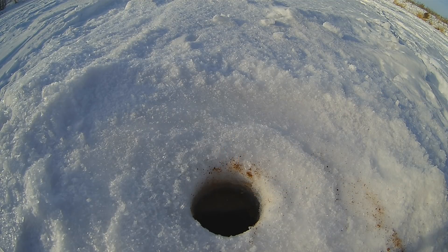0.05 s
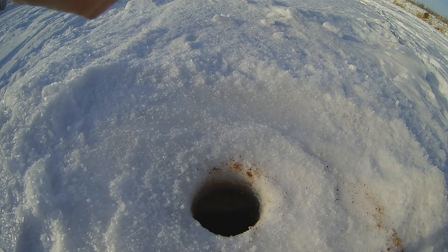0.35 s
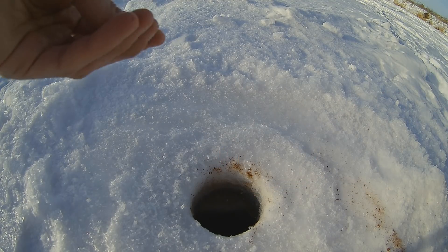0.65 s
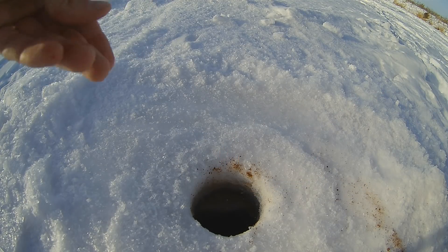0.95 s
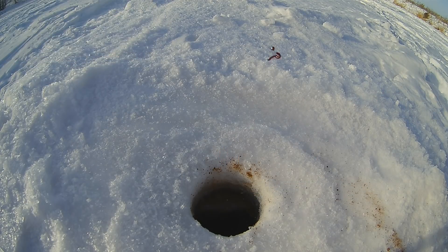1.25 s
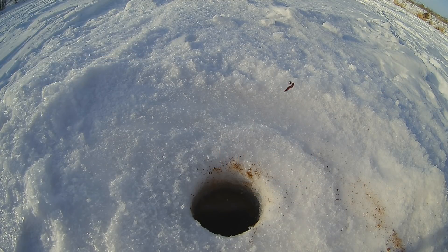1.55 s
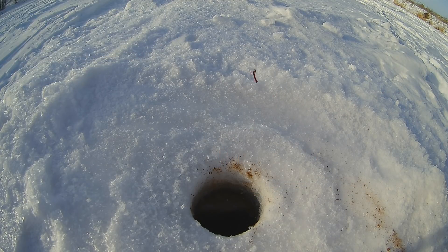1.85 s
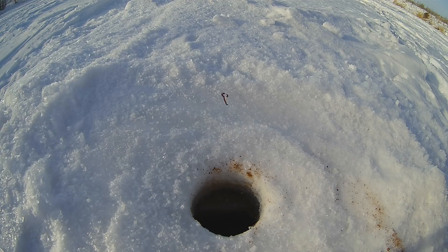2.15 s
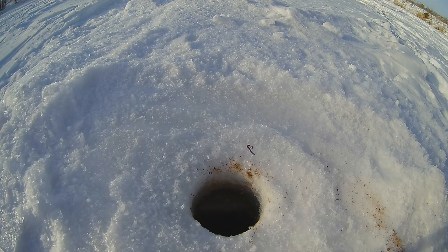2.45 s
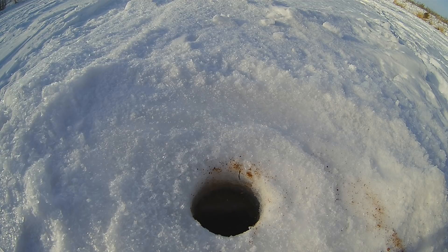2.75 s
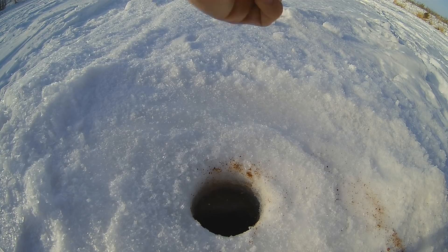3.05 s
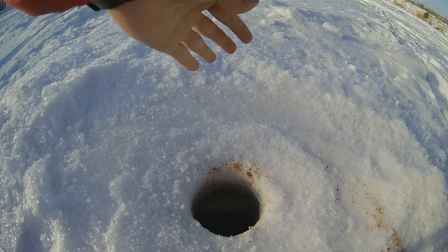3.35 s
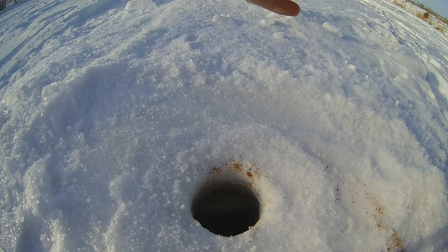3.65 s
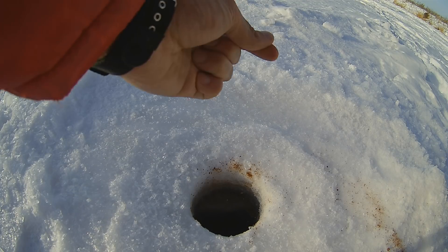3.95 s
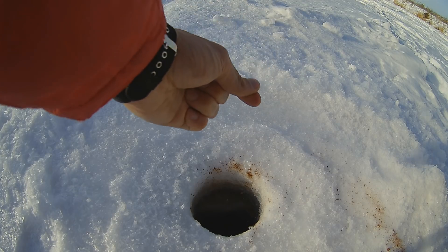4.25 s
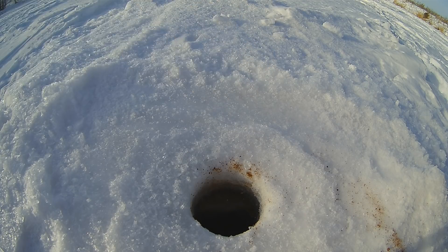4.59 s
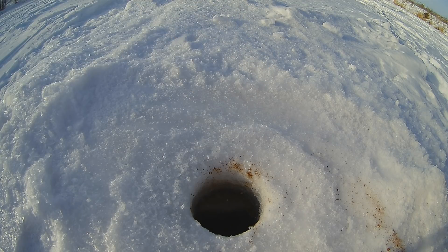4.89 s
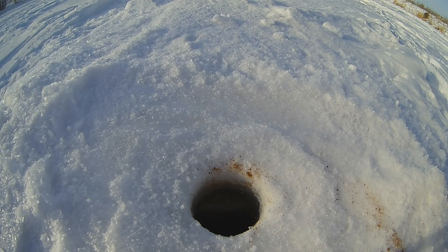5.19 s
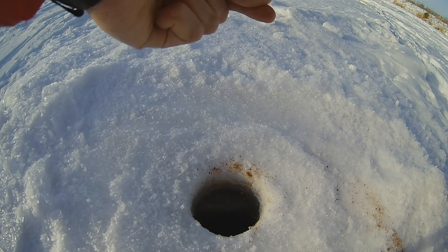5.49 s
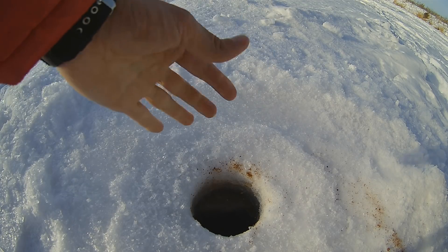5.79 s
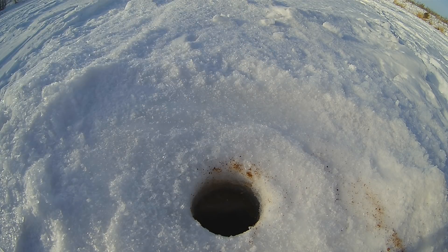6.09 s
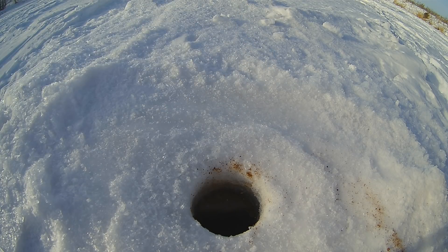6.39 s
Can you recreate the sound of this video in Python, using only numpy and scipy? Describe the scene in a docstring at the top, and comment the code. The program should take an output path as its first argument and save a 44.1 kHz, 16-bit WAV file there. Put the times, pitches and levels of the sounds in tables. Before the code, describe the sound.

Two drawn-out, slightly hoarse whines from an animal follow soft sleeve ticks and high squeaks on a quiet frozen lake.

```python
"""On a still, frozen lake an animal gives short notes, then two long, whining calls.
Faint chirps and thin, high squeaks come in between. The calls are nasal: a tone near 1.3 kHz plus
overtones (multiples of its pitch) shaped by the throat. Each swells, catches and turns hoarse for
moments; the snow gives back almost no echo. A sleeve ticks softly as a hand drops bait by an ice hole,
over low rumble, hiss and a faint electrical hum."""
import sys
import numpy as np
from scipy import signal
from scipy.fft import rfft, irfft
from scipy.io import wavfile

SR = 44100
rng = np.random.default_rng(int(sys.argv[2]) if len(sys.argv) > 2 else 0)


def wav_out(sig):
    """Save sig, one row per channel (or a flat mono array), as 16-bit PCM at SR to the path in sys.argv[1]."""
    wavfile.write(sys.argv[1], SR, np.round(np.clip(np.atleast_2d(sig).T, -1, 1) * 32767).astype(np.int16))


N = 292383

# spectrum of the rumble and hiss: f/Hz, relative level/dB
AIR_SPECTRUM = [(12, -25), (20, 3.5), (48, -9.5), (76, 1), (187, -8.5), (209, -10.5), (233, -9),
                (268, -11.5), (300, -11), (408, -13.5), (586, -13), (1350, -20), (1890, -26), (8090, -37.5),
                (15800, -35.5)]
# tones of the hum: multiple of its base pitch, relative level/dB
HUM_TONES = [(1, -89), (2, -64.5), (3, -69.5), (4, -74.5), (5, -74), (6, -71), (8, -74.5), (10, -75),
             (13, -78.5)]
# resonances, the bands that the throat makes louder: f/Hz, width/Hz
THROAT_BANDS = [(3850, 2100), (5200, 590), (6800, 480), (10600, 6100)]
# extra boost or cut of the overtones: f/Hz, gain/dB
OVERTONE_COLOUR = [(3000, 0.5), (4000, 1.5), (6800, -0.5), (7400, 5.5), (8100, -19.5), (9300, 2.5),
                   (12200, -2.5), (13200, -26), (15000, -11)]
# the voice catches: t/s, half length/s, share lost by the base tone, share lost by the overtones
VOICE_DIPS = [(3.969, 0.012, 0.58, 0.26), (4.034, 0.066, 0.52, 0.21), (4.114, 0.01, 0.43, 0.19),
              (4.142, 0.033, 0.87, 0.4), (4.217, 0.026, 0.46, 0.32), (4.333, 0.0056, 0.36, .1),
              (4.269, 0.015, 0.87, 0.69), (4.382, 0.017, 0.84, .6), (5.34, 0.041, 0.9, 0.081),
              (5.389, 0.012, .1, 0.48), (5.489, 0.034, .78, 0.042), (5.534, 0.02, .05, 0.58),
              (5.563, 0.011, 0.41, 0.51), (5.625, 0.023, 0.78, 0.018), (5.691, 0.0098, 0.54, 0.31),
              (5.757, 0.037, 0.96, .05)]
# hoarse moments: t/s, half length/s, depths of two-cycle wobble, four-cycle wobble and random flutter
HOARSE_MOMENTS = [(3.91, 0.0082, 0.017, 0.17, 0.094), (4.039, 0.009, .02, .17, 0.083),
                  (4.124, 0.015, .02, 0.19, 0.12), (4.312, 0.0072, 0.29, 0.0089, 0.025),
                  (4.427, .02, 0.054, 0.016, 0.042), (4.486, 0.025, .05, .05, 0.16),
                  (5.555, 0.0093, 0.42, .01, 0.013), (5.679, 0.0069, .25, 0.017, 0.058),
                  (5.817, 0.0069, 0.048, .05, .1)]
# short notes: start t/s, rise/s, fall/s, start f/Hz, end f/Hz, base level/dB, relative overtone level/dB
NOTES = [(.007, 0.0032, 0.11, 1348, 1284, -40.5, -66), (2.339, 0.01, 0.01, 1172, 1220, -36.5, -59),
         (2.355, .007, 0.018, 1215, 1250, -48.5, -64), (4.483, 0.0033, 0.015, 1123, 970, -47, -58),
         (5.245, 0.044, 0.0055, 1287, 1286, -41.5, -71), (6.602, 0.0076, 0.074, 1198, 1373, -44.5, -43)]
# the sleeve rustles as the arm moves: t/s, half length/s, relative level/dB
RUSTLES = [(.3, 0.73, -73.5), (1.2, .3, -78), (4.15, 0.46, -66.5), (5.4, 0.55, -73)]
# ticks of sleeve and bait: t/s, relative knock level/dB, relative snap level/dB
SOFT_TICKS = [(.459, -52, -58), (.501, -46, -52), (.557, -52, -56), (.582, -50, -53), (.596, -53, -55),
              (.608, -41, -52), (1.046, -51, -58), (1.089, -51, -58), (1.162, -50, -55), (2.904, -48, -63),
              (3.344, -53, -63), (4.931, -46, -54)]
# a tick's low knock and bright snap: f/Hz, width/Hz
TICK_BANDS = [(1300, 900), (3400, 1200)]
# far-off chirps: start t/s, rise/s, fall/s, start f/Hz, loudest f/Hz, end f/Hz, level/dB
CHIRPS = [(1.95, 0.026, 0.07, 1320, 1345, 1320, -61.5), (2.059, 0.061, 0.056, 1320, 1350, 1310, -64),
          (3.736, 0.0083, .016, 1540, 1690, 2190, -55.5), (3.761, .018, .03, 2045, 1625, 910, -57)]
# thin, high squeaks: start t/s, rise/s, fall/s, start f/Hz, loudest f/Hz, end f/Hz, level/dB
SQUEAKS = [(2.28, .008, 0.03, 8650, 8800, 8950, -60), (2.306, .008, .008, 8850, 8450, 7900, -52),
           (2.325, 0.012, 0.0055, 7520, 7250, 7130, -33), (2.342, 0.0055, .009, 7100, 7150, 7250, -53),
           (2.624, .006, .014, 8800, 8550, 8300, -60), (2.671, 0.011, 0.013, 8500, 8170, 8100, -52),
           (2.697, 0.0078, .018, 7950, 8320, 8540, -44.5), (2.707, 0.057, 0.014, 8350, 8620, 8130, -36),
           (2.776, 0.023, .018, 8100, 8300, 8650, -53), (2.765, .02, .022, 7050, 6750, 6850, -64),
           (4.461, 0.0098, 0.0097, 7500, 7060, 6900, -53), (5.237, .007, .008, 7400, 7450, 7600, -64),
           (5.839, 0.0066, .006, 7300, 6960, 7250, -45), (5.852, 0.0073, 0.013, 7300, 7280, 7200, -54),
           (6.596, 0.0067, 0.017, 7350, 7210, 7260, -54)]
# a brief buzz in the squeaking: t/s, half length/s, beat f/Hz
SQUEAK_BUZZ = (2.798, 0.012, 310)
# long calls: start t/s, length/s, release/s, loudest after/s, base level/dB, sag towards the ends/dB,
# gain of the overtone at twice the pitch/dB, gain of the top throat band/dB
CALLS = [(3.9, 0.579, .045, 0.29, -22, 8.5, -9.5, -13), (5.292, .552, 0.016, 0.21, -22.5, 6.5, -1, -6)]
# pitch curve of each call: t/s, f/Hz
PITCH_CURVES = [
    [(3.918, 1324), (3.96, 1340), (4.038, 1374), (4.092, 1319), (4.11, 1308), (4.15, 1359), (4.19, 1337),
     (4.382, 1350), (4.448, 1323)],
    [(5.306, 1278), (5.362, 1304), (5.5, 1340), (5.586, 1338), (5.742, 1311), (5.826, 1295)],
]
# overtone curves of each call: t/s, relative lower level/dB, relative upper level/dB
OVERTONE_CURVES = [
    [(3.912, -48.5, -59), (3.932, -41.5, -54.5), (4.006, -42.5, -64), (4.024, -53.5, -58.5),
     (4.174, -45.5, -47.5), (4.19, -50.5, -49), (4.276, -43, -46.5), (4.362, -45.5, -46),
     (4.465, -48, -55.5)],
    [(5.3, -39.5, -54), (5.448, -37, -59), (5.468, -43, -52), (5.51, -41.5, -54), (5.52, -43.5, -60),
     (5.708, -48, -54.5), (5.734, -52.5, -51), (5.822, -50.5, -60.5), (5.83, -42, -61.5)],
]


def from_db(db):
    return 10 ** (np.asarray(db) / 20)


def unit_level(x):
    return x / np.sqrt(np.mean(x ** 2) + 1e-20)


def gain_at(spectrum, hz):
    """Read a spectrum's gain on a log-frequency axis."""
    freq, db = np.transpose(spectrum)
    return from_db(np.interp(np.log(np.maximum(hz, 1)), np.log(freq), db))


def read_curves(rows, t):
    times, *columns = np.transpose(rows)
    return [np.interp(t, times, column) for column in columns]


def note_span(start, length):
    """Sample numbers and times of one note."""
    at = np.arange(max(int(start * SR), 0), min(int((start + length) * SR), N))
    return at, at / SR


def bump(t, centre, half_length):
    return np.exp(-((t - centre) / half_length) ** 2)


def swell(t, start, rise, fall, values=(0, 1, 0)):
    """Straight lines from a note's start to its loudest moment and on to its end."""
    return np.interp(t, [start, start + rise, start + rise + fall], values)


def drift(rate, size):
    """A smooth random wander of about 1 that changes about rate times a second."""
    hz = np.fft.rfftfreq(SR, 1 / SR)
    return unit_level(irfft(rfft(rng.standard_normal(SR)) / (1 + (hz / rate) ** 4), SR))[:size]


def band_noise(centre_hz, width_hz, size):
    """Noise through one resonance."""
    r = np.exp(-np.pi * width_hz / SR)
    poles = [1, -2 * r * np.cos(2 * np.pi * centre_hz / SR), r * r]
    return unit_level(signal.lfilter([1, 0, -1], poles, rng.standard_normal(size)))


def rumble_and_hiss(level_db=-54):
    """Steady noise, strongest in the deep bass."""
    hz = np.fft.rfftfreq(N, 1 / SR)
    noise = irfft(rfft(rng.standard_normal(N)) * gain_at(AIR_SPECTRUM, hz), N)
    return from_db(level_db) * unit_level(noise)


def hum(base_hz=29.8, gain_db=-0.5):
    """A weak electrical hum: steady tones at multiples of one low pitch."""
    t = np.arange(N) / SR
    tones = sum(from_db(db) * np.sin(2 * np.pi * (k * base_hz * t + rng.random())) for k, db in HUM_TONES)
    return from_db(gain_db) * np.sqrt(2) * tones


def throat(hz, drives_db):
    """Strength of an overtone after the throat's bands, each driven at its own level."""
    power = sum(from_db(db) ** 2 / (1 + (2 * (hz - centre) / width) ** 4)
                for (centre, width), db in zip(THROAT_BANDS, drives_db))
    return np.sqrt(power) * gain_at(OVERTONE_COLOUR, hz)


def voice(t, pitch, base, overtones, drives_db, second_db, shimmer_db=3.0, shimmer_hz=32):
    """A base tone with overtones; when hoarse, its cycles repeat in twos or fours, adding tones between."""
    size = len(t)
    twos, fours, flutter = sum(np.outer(depths, bump(t, s, w)) for s, w, *depths in HOARSE_MOMENTS)
    flutter += 0.012  # even the clear voice rasps a little
    # the overtones hold on longer into a dip than the base tone does
    for when, half_length, base_lost, overtones_lost in VOICE_DIPS:
        base = base * (1 - base_lost * bump(t, when, half_length))
        overtones = overtones * (1 - overtones_lost * bump(t, when, half_length / 2))
    tremble = 1 + 0.0042 * drift(55, size)
    phase = 2 * np.pi * np.cumsum(pitch * tremble) / SR
    phase += 0.41 * flutter * drift(1600, size)  # single cycles come early or late
    out = base * from_db(1.18 * drift(56, size)) * np.sin(phase)
    out += base * twos * (.1 * np.sin(phase / 2) + .22 * np.sin(1.5 * phase))
    out += base * fours * (.5 * np.sin(.75 * phase) + .2 * np.sin(1.25 * phase) + .2 * np.sin(1.5 * phase))
    # the tone at twice the pitch lies below the throat's bands and follows their average drive
    second = from_db(np.mean(drives_db, axis=0) + second_db + shimmer_db * drift(shimmer_hz, size))
    out += overtones * second * np.sin(2 * phase)
    for k in range(3, 12):
        # each overtone wavers on its own, the high ones most
        waver = from_db((shimmer_db + 0.7 * k) * np.tanh(drift(shimmer_hz, size)))
        strength = overtones * throat(k * pitch, drives_db) * waver
        out += strength * np.sin(k * phase + rng.uniform(0, 2 * np.pi))
        between = k - .5
        out += 1.16 * twos * overtones * throat(between * pitch, drives_db) * np.sin(between * phase)
    return out * (1 + flutter * drift(380, size))


def short_notes(drives_db=(-2, 6, -4, -25)):
    """The animal's voice in brief: one swell on one slide in pitch."""
    out = np.zeros(N)
    for start, rise, fall, start_hz, end_hz, base_db, overtone_db in NOTES:
        at, t = note_span(start, rise + fall)
        pitch = np.interp(t, [start, start + rise + fall], [start_hz, end_hz])
        gain = swell(t, start, rise, fall)
        out[at] += voice(t, pitch, from_db(base_db) * gain, from_db(overtone_db) * gain,
                         drives_db, second_db=2.5)
    return out


def sleeve_and_bait(decay_s=0.0037, tick_gain_db=-1, muffle_hz=4800):
    """Cloth rustles as the arm moves; each muffled tick is a tiny burst of noise in two bands."""
    t = np.arange(N) / SR
    movement = sum(from_db(db) * bump(t, s, w) for s, w, db in RUSTLES)
    out = movement * band_noise(2700, 3600, N)
    age = t[:SR // 20]
    for when, *levels in SOFT_TICKS:
        start = int(when * SR)
        for db, (hz, width) in zip(levels, TICK_BANDS):
            band = signal.butter(2, [hz - width / 2, hz + width / 2], "band", fs=SR, output="sos")
            burst = signal.sosfilt(band, np.exp(-age / decay_s) * rng.standard_normal(len(age)))
            out[start:start + len(age)] += from_db(db + tick_gain_db) * burst / np.abs(burst).max()
    return signal.sosfilt(signal.butter(2, muffle_hz, fs=SR, output="sos"), out)


def chirps_and_squeaks(shimmer_db=2.1):
    """Each is one unsteady, pure tone that swells and bends where it is loudest."""
    out = np.zeros(N)
    buzz_time, buzz_half_length, beat_hz = SQUEAK_BUZZ
    for start, rise, fall, *pitches, db in SQUEAKS + CHIRPS:
        at, t = note_span(start, rise + fall)
        pitch = swell(t, start, rise, fall, pitches) * (1 + 0.0025 * drift(250, len(t)))
        phase = 2 * np.pi * np.cumsum(pitch) / SR
        buzz = 1 + bump(t, buzz_time, buzz_half_length) * np.sin(2 * np.pi * beat_hz * t)
        gain = from_db(db + shimmer_db * drift(100, len(t))) * swell(t, start, rise, fall)
        out[at] += gain * buzz * np.sin(phase)
    return out


def whining_calls(scoop_hz=113, scoop_s=0.00696, drop_hz=173.4, attack_s=0.017, overtone_fade_s=0.0079):
    """Each call scoops up to its pitch, swells in an arch and drops in pitch as it dies."""
    out = np.zeros(N)
    for call, pitch_curve, overtone_curves in zip(CALLS, PITCH_CURVES, OVERTONE_CURVES):
        start, length, release, loudest, db, sag_db, second_db, top_db = call
        at, t = note_span(start, length)
        age, left = t - start, start + length - t
        # the pitch lifts where the voice thins out and sinks where it turns hoarse
        lift = 14 * sum(lost * bump(t, s, w) for s, w, lost, _ in VOICE_DIPS)
        sink = 12 * sum(bump(t, s, 2 * w) for s, w, *_ in HOARSE_MOMENTS)
        scoop = scoop_hz * np.exp(-age / scoop_s)
        drop = drop_hz * np.maximum(1 - left / (0.65 * release), 0)
        pitch = read_curves(pitch_curve, t)[0] + lift - sink - scoop - drop
        arch = from_db(db - sag_db * (2 * (age - loudest) / length) ** 2)
        base = arch * np.clip(np.minimum(age / attack_s, left / release), 0, 1)
        # the overtones come in faster than the base tone
        overtones = np.clip(np.minimum(t - t[0], t[-1] - t) / overtone_fade_s, 0, 1)
        lower, upper = read_curves(overtone_curves, t)
        drives_db = [lower - 1 - 12.5 * age, lower, upper + 4, upper + top_db]  # the lowest band fades
        out[at] += voice(t, pitch, base, overtones, drives_db, second_db)
    return out


def snow_echo(sound, decay_s=0.35, echo_db=-33):
    """The rough snow adds a very weak, short tail to the sound."""
    age = np.arange(SR // 2) / SR
    tail = band_noise(1000, 1700, len(age)) * from_db(-60 * age / decay_s)
    return sound + from_db(echo_db) * signal.fftconvolve(sound, tail / np.linalg.norm(tail))[:N]


def scene():
    """The animal, the sleeve and the quiet of the lake, in one channel."""
    calls = chirps_and_squeaks() + whining_calls() + short_notes()
    return (snow_echo(calls) + sleeve_and_bait() + rumble_and_hiss() + hum())[None]


def record(dry):
    """A steep filter cuts the treble above 15.8 kHz."""
    return signal.sosfilt(signal.ellip(12, .1, 80, 15800, fs=SR, output="sos"), dry)


dry = scene()
out = record(dry)
wav_out(out)
```